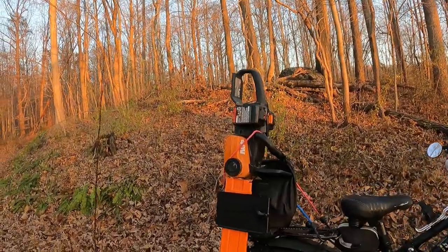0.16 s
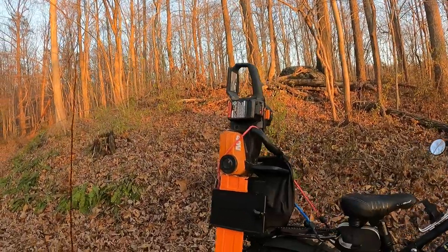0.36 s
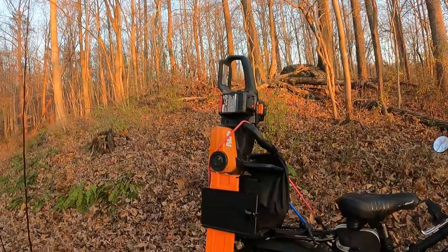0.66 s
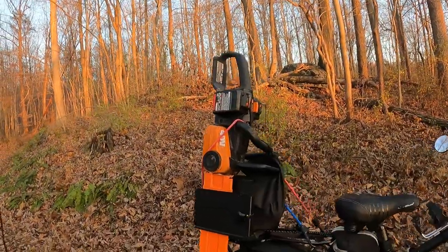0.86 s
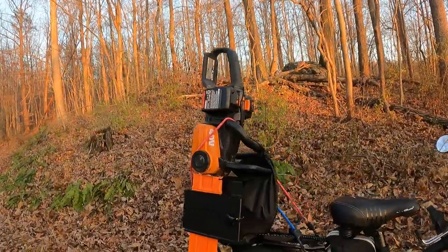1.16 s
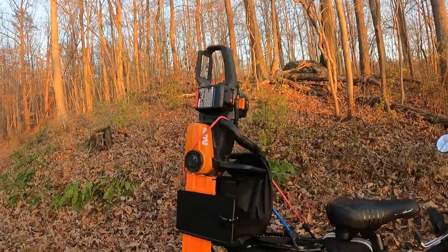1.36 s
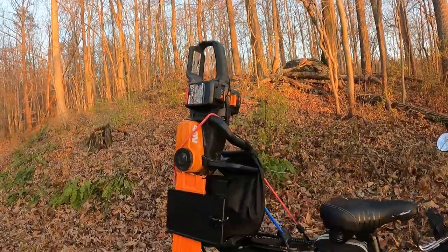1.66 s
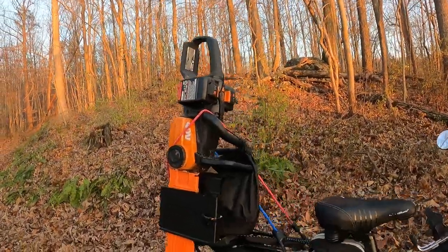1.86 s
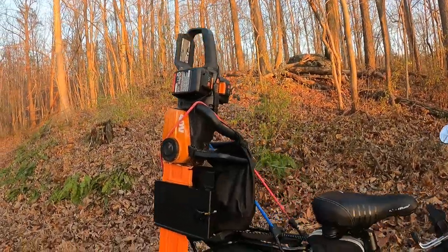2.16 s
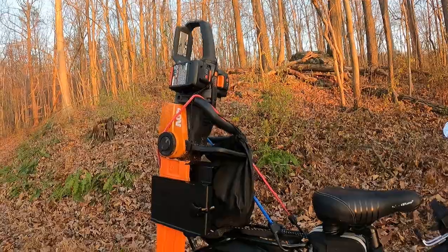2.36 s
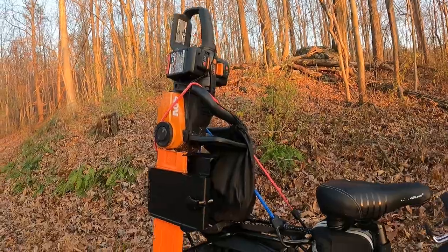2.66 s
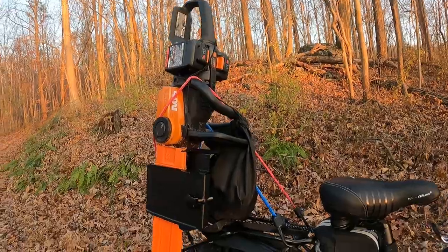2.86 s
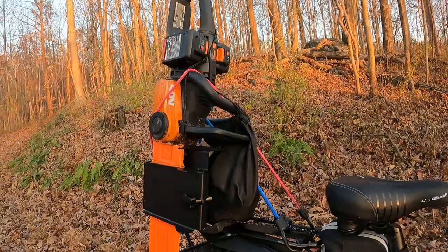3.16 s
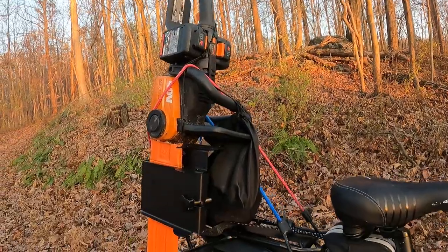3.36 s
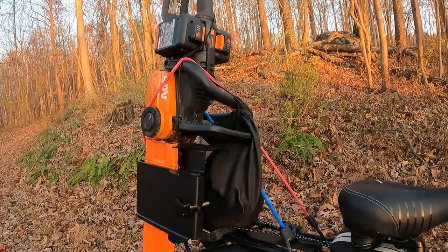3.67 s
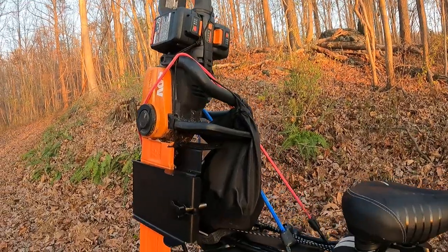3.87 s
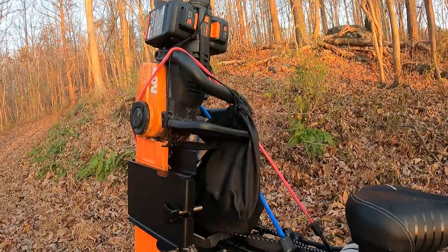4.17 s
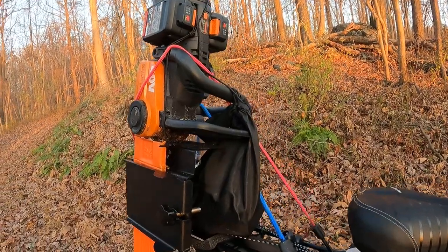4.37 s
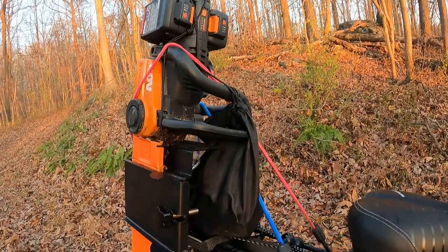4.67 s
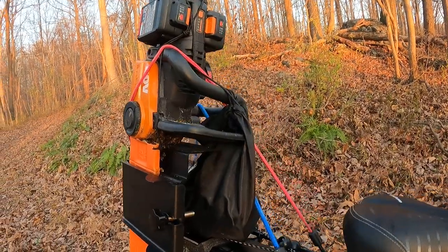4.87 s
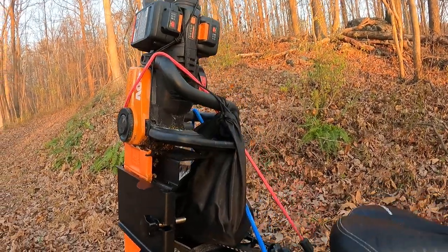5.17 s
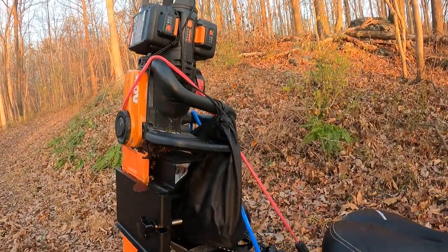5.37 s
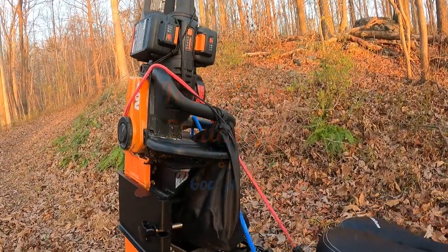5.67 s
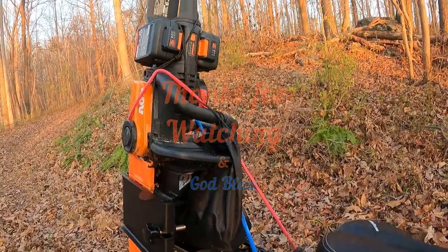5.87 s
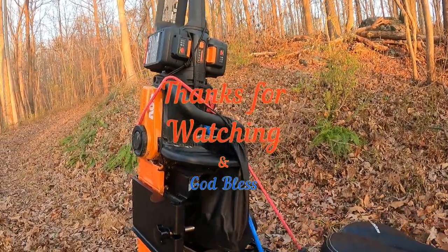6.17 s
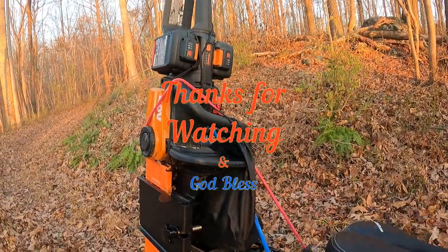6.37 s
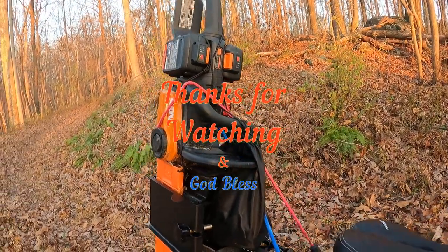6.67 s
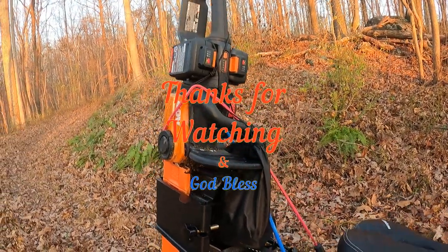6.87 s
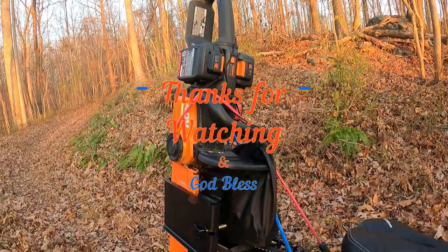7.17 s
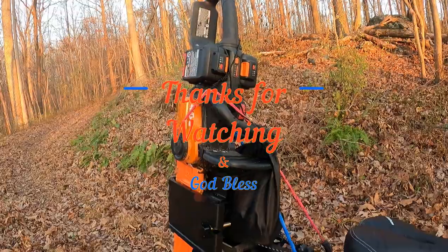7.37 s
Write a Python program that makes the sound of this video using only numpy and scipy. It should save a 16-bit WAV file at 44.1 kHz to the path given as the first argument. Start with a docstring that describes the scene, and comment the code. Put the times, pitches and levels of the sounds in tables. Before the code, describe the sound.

Close, dry leaf crunching on an outdoor trail: uneven strides crush the litter into countless tiny cracks, while leaves keep stirring between them and stalks pop singly. A soft low rumble of air and a faint forest hush lie underneath. After one last crisp push the rustling thins to isolated ticks and the air swells. The stereo picture leans left, with little reverberation and limited treble.

```python
"""On a forest trail someone carrying a camera shuffles slowly through deep dry leaves underfoot.
From the start, light air (low noise) rumbles on the microphone, whose left side is the louder,
over a forest hush; leaves stir, and stalks and twigs snap singly as short cracks with a ring.
Then stride after stride crushes the litter into thousands of tiny cracks (damped rings and noise),
with a duller scuff and a murmur of soil. After the last push the leaves settle and the air swells."""
import sys
import numpy as np
from scipy import signal
from scipy.fft import rfft, irfft, next_fast_len
from scipy.io import wavfile
from scipy.ndimage import map_coordinates

SR = 44100
rng = np.random.default_rng(int(sys.argv[2]) if len(sys.argv) > 2 else 0)


def dump(signal):
    """Clip the signal to [-1, 1] and save it as 16-bit WAV at the path in sys.argv[1]."""
    limited = np.clip(np.atleast_2d(signal).T, -1, 1)
    pcm = np.round(limited * 32767).astype(np.int16)
    wavfile.write(sys.argv[1], SR, pcm)


N = 332073  # length in samples
TOP_HZ = 7650  # band limit of the camera, and the highest pitch of a tiny crack


def amp(db):
    """Decibels to gain."""
    return 10 ** (np.asarray(db) / 20)


def unit(pair):
    """A stereo pair scaled so that its middle, the mean of left and right, has rms 1."""
    return pair / np.sqrt(np.mean(pair.mean(axis=0) ** 2) + 1e-20)


def along(points, hz):
    """(Hz, value) points read on a log frequency axis."""
    point_hz, values = np.transpose(points)
    return np.interp(np.log(hz + 1), np.log(point_hz + 1), values)


def curves(rows):
    """One value per sample for each column after the time in seconds."""
    seconds, *columns = np.transpose(rows)
    t = np.arange(N) / SR
    return [np.interp(t, seconds, column) for column in columns]


def wobble(rate):
    """A smooth random curve through normal random knots, rate knots a second."""
    knots = rng.standard_normal(int(N * rate / SR) + 4)
    return map_coordinates(knots, [np.arange(N) * rate / SR])


def coloured(x, points):
    """x through a causal minimum-phase filter with the gain of the (Hz, dB) points."""
    m = 2 * next_fast_len(N // 2 + SR // 4)
    gain = amp(along(points, np.fft.rfftfreq(m, 1 / SR)))
    cepstrum = irfft(np.log(gain))
    # folding the cepstrum onto positive times makes the filter causal
    cepstrum[1:m // 2] *= 2
    cepstrum[m // 2 + 1:] = 0
    return irfft(rfft(x, m) * np.exp(rfft(cepstrum)), m)[..., :N]


# Left microphone port against the right one.
# Each row: frequency in Hz, left over right in dB, phase lead of the left in radians.
PORT_BALANCE = [(8, 7, 0), (28, 1, 0), (80, .5, 0), (180, 4, 0), (300, 6.8, -.1), (520, 8, -.2),
                (900, 8.3, -.45), (1300, 9, -.25), (1750, 8.7, .5), (2600, 7.3, .75), (3450, 9, .85),
                (4500, 12, .3), (7700, 9, .5)]


def leftward(pair):
    """The right port, in the lee of the camera, gets the sound weaker and shifted in phase."""
    m = next_fast_len(N + SR // 2)
    hz = np.fft.rfftfreq(m, 1 / SR)
    ports = np.array(PORT_BALANCE)
    left_over_right_db = along(ports[:, :2], hz)
    left_lead = along(ports[:, ::2], hz)
    shade = amp(-left_over_right_db) * np.exp(-1j * left_lead)
    right = irfft(rfft(pair[1], m) * shade, m)[:N]
    return np.array([pair[0], right])


def noise(width):
    """White stereo noise; width is side over middle."""
    mid, side = rng.standard_normal((2, N))
    return np.array([mid + width * side, mid - width * side])


def grains(density, spread_db, t60, lag_ms, pan_db):
    """Tiny cracks, density a second: each is a damped ring with its own pitch, size and place."""
    count = np.cumsum(density) / SR
    chance = rng.random((int(count[-1]), 7))
    when, pitch, size, life, lag, pan, phase = chance.T[:, :, None]
    start = np.searchsorted(count, when * count[-1])
    t = np.arange(SR // 125) / SR  # each ring is cut after 8 ms
    life = t60 * 2 ** (2 * life - 1)  # half to twice the given t60
    # dividing by the root of its life gives a short ring as much energy as a long one
    size = amp(spread_db * np.minimum(-np.log(1 - size), 4.5)) / np.sqrt(life)
    fade = size * amp(-60 * t / life)
    pair = []
    for side in (-1, 1):
        late = t + side * (lag - .5) * lag_ms / 1000
        swing = np.sin(2 * np.pi * (pitch * TOP_HZ * late + phase))
        ring = amp(side * (pan - .5) * pan_db) * fade * swing
        samples = start + np.arange(len(t))
        pair.append(np.bincount(samples.ravel(), ring.ravel(), N)[:N])
    # more cracks a second do not by themselves make it louder
    return unit(np.array(pair) / np.sqrt(density))


def bursts(rate, t60):
    """Power of sudden collapses at random moments, rate a second, each dying away; mean 1."""
    kicks = (rng.random(N) < rate / SR) * rng.random(N) ** 2
    power = signal.lfilter([1], [1, -amp(-60 / (t60 * SR)) ** 2], kicks)
    return power / power.mean()


# Moving air close on the microphone, before a 4.5 dB lift and the buffeting.
# Each row: time in seconds, level in dB.
BREEZE = [(0, -48.5), (.65, -44.5), (1.05, -48.5), (1.4, -46), (1.8, -47.5), (2.5, -47), (3.15, -49),
          (3.8, -51.5), (4.4, -50.5), (5.2, -47.5), (6.15, -47), (6.6, -54.5), (7, -41), (7.53, -43.5)]
# Colour of that air on the ports. Each row: frequency in Hz, gain in dB.
AIR_COLOUR = [(5, -6), (14, 0.5), (25, -13), (42, -17.5), (60, -18.5), (80, -26), (200, -46.5),
              (600, -77.5), (2000, -120)]
# Colour of the forest hush around. Each row: frequency in Hz, gain in dB.
FOREST_COLOUR = [(70, -3), (350, -6.5), (520, -4), (720, -5), (1000, -28), (3200, -13.5), (4000, -15.5),
                 (7500, -53.5)]


def air():
    """Soft buffeting on the ports, low noise of wavering level, over the steady hush of the forest."""
    breeze_db, = curves(BREEZE)
    buffet_db = 1.2 * wobble(4.4)
    rumble = unit(leftward(coloured(noise(width=.31), AIR_COLOUR)))
    hush = unit(leftward(coloured(noise(width=0.22), FOREST_COLOUR)))
    return amp(breeze_db + 4.5 + buffet_db) * rumble + amp(-52) * hush


# Leaves that keep stirring and settling between the pushes, before flutter and the leaves' trim.
# Each row: time in seconds, crackle in dB.
STIR = [(0.0, -35.0), (0.89, -34.5), (1.31, -41.0), (1.49, -38.5), (1.7, -40.0), (1.98, -34.5),
        (3.61, -34.5), (3.74, -37.5), (4.38, -34.5), (5.03, -36.5), (5.47, -45.0), (5.73, -38.5),
        (6.39, -37.5), (6.63, -46.5), (7.04, -43.0), (7.14, -52.0), (7.37, -46.5), (7.53, -51.5)]
STIR_SCUFF_DB, STIR_WEIGHT_DB = -6.5, -15.5  # litter and soil, relative to the stirring crackle
STIR_FLUTTER_DB, STIR_FLUTTER_HZ = 1.01, 16  # the stirring comes in small fits
# Pushes of a foot through the leaves; levels are before flutter and each layer's own trim.
# Each row: start in seconds, length in seconds, swell over the push in dB, crackle at its end in dB,
# scuff of the litter at its end in dB, weight on the soil at its end in dB.
STRIDES = [(0.36, 0.3, 3.0, -23.5, -31.0, -39.5), (0.66, 0.21, -2.5, -33.5, -40.5, -56),
           (1.73, 0.07, 3.0, -31.5, -47, -60.0), (1.95, 0.39, 5.5, -26.5, -36.5, -54),
           (2.34, 0.4, -1.5, -27.0, -43.5, -47.5), (2.68, 0.47, 5.0, -22.0, -31.5, -38.5),
           (3.23, 0.04, 1.0, -24.5, -34.5, -38.5), (3.32, 0.28, 4.5, -28.0, -34, -47),
           (4.07, 0.23, -2.5, -29.5, -39, -45.5), (4.43, 0.28, 12.5, -20.5, -28, -40.0),
           (4.83, 0.11, 0.5, -32.5, -43, -46.5), (5.17, 0.09, 2.0, -37.0, -52.0, -54),
           (5.75, 0.37, 7.5, -25.0, -32.5, -47.5), (6.12, 0.33, -1.0, -36.0, -41.5, -50),
           (6.38, 0.45, -3.5, -51.5, -49.0, -47)]
ATTACK_SHARE = .22  # part of each push that the foot takes to sink into the leaves
RELEASE_DB_PER_S = 143  # the leaves come to rest after it
PUSH_FLUTTER_DB, PUSH_FLUTTER_HZ = .55, 22.01  # the foot catches and slips as it pushes


def footwork():
    """Crackle, scuff and weight in dB: each push sets in, swells and dies away over the stirring."""
    t = np.arange(N) / SR
    stir_db, = curves(STIR)
    stir_db = stir_db + STIR_FLUTTER_DB * wobble(STIR_FLUTTER_HZ)
    power = amp([stir_db, stir_db + STIR_SCUFF_DB, stir_db + STIR_WEIGHT_DB]) ** 2
    catch_db = PUSH_FLUTTER_DB * wobble(PUSH_FLUTTER_HZ)
    for start, length, swell_db, crackle_db, scuff_db, weight_db in STRIDES:
        age = t - start
        rise_db = swell_db * (np.clip(age / length, 0, 1) - 1)
        fall_db = RELEASE_DB_PER_S * np.maximum(age - length, 0)
        attack = np.clip(age / (ATTACK_SHARE * length), 0, 1)
        push = attack * amp(rise_db - fall_db + catch_db)
        power = power + np.outer(amp([crackle_db, scuff_db, weight_db]), push) ** 2
    return 10 * np.log10(power)


# Colour of the dry leaves at the feet. Each row: frequency in Hz, gain in dB.
LEAF_COLOUR = [(150, -39), (500, -12.5), (900, -11.5), (1400, -2.5), (2200, 0.5), (2700, -0.5), (3350, 1),
               (3550, -4), (4200, -7), (5000, -12), (5600, -15.5), (6050, -24.5), (6800, -27),
               (7500, -34.5), (9000, -63.5)]
# Rustle above about 4 kHz. Each row: time in seconds, change of level in dB.
TREBLE = [(0, -2.5), (1.5, 3), (2.5, 0), (5, -2.5), (6.7, 1.5), (7.5, -3)]


def leaves(crackle_db):
    """A harder push breaks more leaves at once, so that single collapses merge into a steadier rush."""
    treble_db, = curves(TREBLE)
    push = amp(np.clip(crackle_db + 30, -14, 10))
    cracks = grains(3800 * push ** .5, spread_db=0.5, t60=0.0097, lag_ms=0.047, pan_db=2.5)
    ticks = grains(280 * push ** .3, spread_db=-1.0, t60=.0016, lag_ms=0.092, pan_db=8.5)
    # each leaf gives way abruptly and crackles on for a moment
    share = np.clip(0.22 * push ** -.5, 0, .5)
    clumps = np.sqrt(1 - share + share * bursts(rate=130, t60=.028))
    rustle = clumps * (cracks + .4 * ticks + .7 * noise(width=.3))
    high_pass = signal.butter(2, 4000, "high", fs=SR, output="sos")
    treble = signal.sosfiltfilt(high_pass, rustle)
    rustle = rustle + (amp(treble_db) - 1) * treble
    return amp(crackle_db - 0.99) * unit(leftward(coloured(rustle, LEAF_COLOUR)))


# Colour of the packed litter under the shoe. Each row: frequency in Hz, gain in dB.
LITTER_COLOUR = [(60, -35.5), (200, -18), (360, -9), (410, -0.5), (490, -.5), (580, 1), (790, 0.5),
                 (950, -2.5), (1400, -0.5), (2000, -7), (3500, -13), (8000, -57.5)]


def litter(scuff_db):
    """The packed layer under the shoe crunches lower and softer: unsteady grains and noise."""
    crunch = grains(np.full(N, 3000), spread_db=2.5, t60=0.011, lag_ms=0.19, pan_db=4.5)
    scuff = amp(1 * wobble(70)) * (crunch + noise(width=0.12))
    return amp(scuff_db + 1.56) * unit(leftward(coloured(scuff, LITTER_COLOUR)))


# Colour of the soft ground below the litter. Each row: frequency in Hz, gain in dB.
SOIL_COLOUR = [(40, -12), (85, -3.5), (170, -1.5), (205, 0), (245, 2.5), (320, -4), (450, -15.5),
               (1500, -49.5), (5000, -86.5)]


def ground(weight_db):
    """Damp soil gives under the walker's weight with a dull murmur of low noise."""
    murmur = unit(leftward(coloured(noise(width=0.14), SOIL_COLOUR)))
    return amp(weight_db - 1.0 + 1.0 * wobble(25)) * murmur


def snap(hz, edge_hz, t60, ring_db, splinter_db, splinter_t60):
    """One break of energy 1: a crack, the brief ring of the stalk and a splintering tail."""
    t = np.arange(SR // 20) / SR  # cut after 50 ms

    def fade(seconds):
        """Decay by 60 dB in the given time."""
        return amp(-60 * t / max(seconds, 1e-4))

    ring = 0
    # modes of the stalk: ratio to the pitch, level in dB, ratio to t60
    for ratio, db, life in [(1, 7.0, 1), (0.44, -12.0, 0.75), (0.87, -12, 0.67)]:
        mode_hz = hz * ratio * rng.normal(1, 0.0092)
        ring = ring + amp(db) * np.sin(2 * np.pi * mode_hz * t) * fade(t60 * life)
    splinters = amp(splinter_db) * rng.laplace(size=(2, len(t))) * fade(splinter_t60)
    # brittle leaves crack brightly, thicker twigs duller
    band = signal.butter(2, [hz / 3, edge_hz], "band", fs=SR)
    crack = signal.lfilter(*band, rng.standard_normal(len(t)) * fade(t60) + splinters)
    # the nearer the edge of the crack is to the pitch, the stronger the ring
    onset = 1 - np.exp(-t / 0.00015)
    pair = (amp(ring_db) * (hz / edge_hz) ** 2 * ring + crack) * onset
    return pair / np.linalg.norm(pair.mean(axis=0))


# Stalks and twigs that break near the feet; levels are before the colour and a 6 dB lift.
# Each row: start in seconds, rms over 10 ms in dB, pitch in Hz, upper edge of the crack in Hz,
# time to fall by 60 dB in seconds.
SNAPS = [(0.021, -25.5, 1450, 1900, 0.019), (0.174, -27, 1480, 5100, 0.019), (0.726, -25, 940, 2080, .009),
         (1.007, -27, 2630, 5100, 0.016), (1.021, -34.5, 3280, 4140, 0.02), (1.096, -29, 2020, 3700, 0.014),
         (1.255, -31.5, 2550, 3700, 0.0047), (1.468, -37.5, 2260, 3300, 0.036),
         (1.532, -31.5, 1890, 4300, .016), (1.616, -36.5, 3080, 5100, 0.0082),
         (1.757, -31, 3170, 4860, .007), (2.121, -32, 2520, 3320, 0.0078),
         (3.296, -24.5, 1500, 3000, 0.0061), (3.613, -33.5, 2300, 3500, .02),
         (3.737, -33.5, 2730, 3540, 0.017), (3.777, -34.5, 1830, 2500, 0.019),
         (3.815, -31, 880, 2100, 0.035), (3.854, -30, 1720, 2520, 0.0062), (3.889, -32, 850, 1500, 0.014),
         (3.945, -31, 2240, 3600, 0.0059), (3.96, -33.5, 1230, 3600, 0.0058),
         (4.004, -28.5, 2980, 4120, 0.039), (4.079, -31, 2040, 3900, 0.015),
         (4.096, -26.5, 2680, 3420, 0.04), (4.281, -28, 2390, 3370, .009),
         (4.473, -24.5, 1810, 3340, 0.063), (5.105, -33, 1080, 2860, .04), (5.364, -39, 1830, 2500, .011),
         (5.539, -34, 2520, 3370, 0.015), (5.572, -29.5, 2590, 3230, 0.0083),
         (5.627, -35.5, 2770, 3580, 0.0092), (5.928, -28.5, 3130, 4000, 0.025),
         (6.138, -27, 2650, 3700, 0.01), (6.263, -31, 3350, 4300, 0.036), (6.28, -29, 2800, 3720, .022),
         (6.32, -30.5, 2870, 3660, 0.008), (6.411, -29, 1400, 3800, 0.01), (6.516, -36, 1940, 3000, 0.012),
         (6.63, -44, 2440, 4080, 0.014), (6.841, -42, 3030, 3900, .013), (6.862, -38.5, 3500, 5200, .008),
         (7.147, -42, 1210, 2900, 0.032), (7.208, -39, 2520, 3420, .007), (7.443, -31.5, 1650, 3460, 0.034),
         (7.492, -39.5, 1580, 2600, 0.045)]
# Colour of the breaks. Each row: frequency in Hz, gain in dB.
CRACK_COLOUR = [(100, -3), (450, -5.5), (1500, -1.5), (3400, -2), (3700, -0.5), (5500, -3), (6200, -16.5),
                (8000, -19.5)]


def twigs():
    """The single breaks that stand out of the rustle, each a ringing crack at its own moment."""
    out = np.zeros((2, N + SR))
    for start, db, hz, edge_hz, t60 in SNAPS:
        pair = snap(hz, edge_hz, t60, ring_db=-1, splinter_db=-22, splinter_t60=.04)
        first = round(start * SR)
        # energy 1 spread over 10 ms becomes rms 1
        out[:, first:first + pair.shape[1]] += amp(db) * np.sqrt(SR / 100) * pair
    return amp(6) * leftward(coloured(out[:, :N], CRACK_COLOUR))


def scene():
    """Footwork in the leaves, in the open air."""
    crackle_db, scuff_db, weight_db = footwork()
    underfoot = leaves(crackle_db) + litter(scuff_db) + ground(weight_db)
    return air() + underfoot + twigs()


def record(dry):
    """The camera keeps next to nothing above its band limit: a very steep low-pass."""
    m = next_fast_len(N + SR // 2)
    hz = np.fft.rfftfreq(m, 1 / SR)
    return irfft(rfft(dry, m) / np.sqrt(1 + (hz / TOP_HZ) ** 120), m)[:, :N]


dry = scene()
out = record(dry)
dump(out)
```